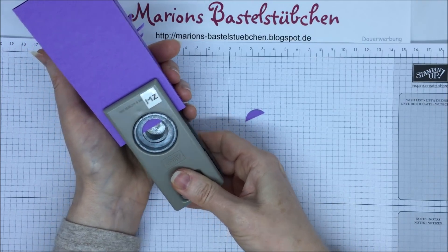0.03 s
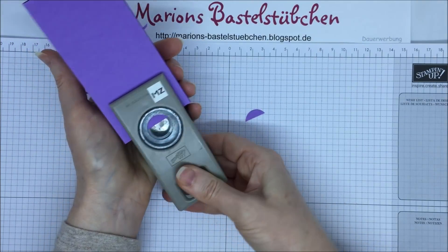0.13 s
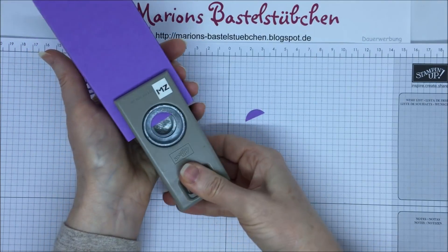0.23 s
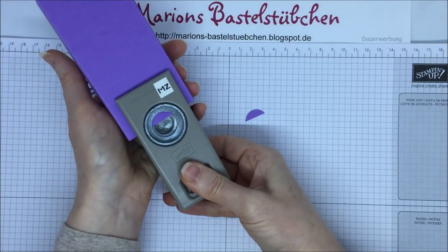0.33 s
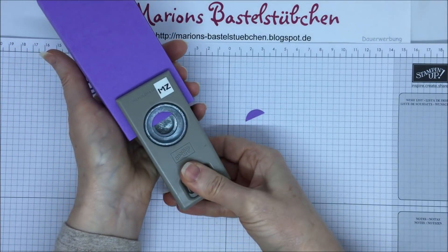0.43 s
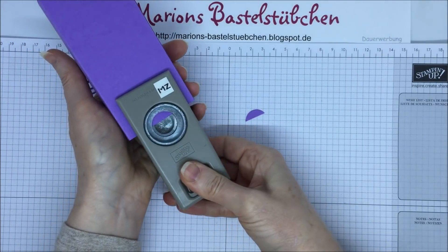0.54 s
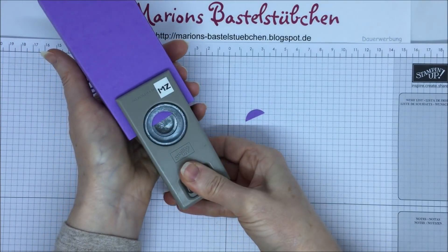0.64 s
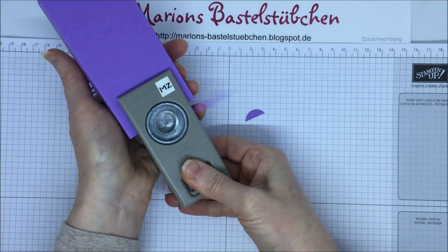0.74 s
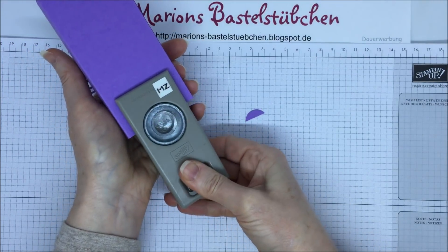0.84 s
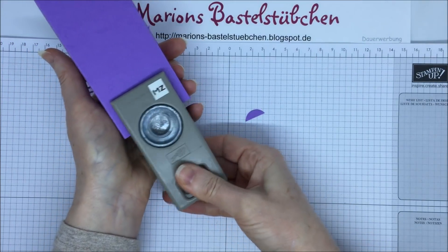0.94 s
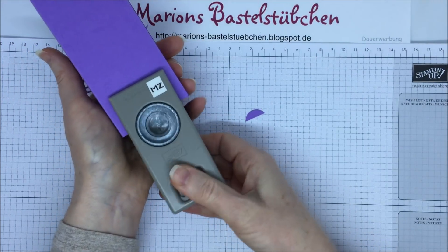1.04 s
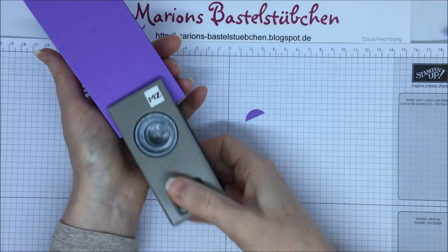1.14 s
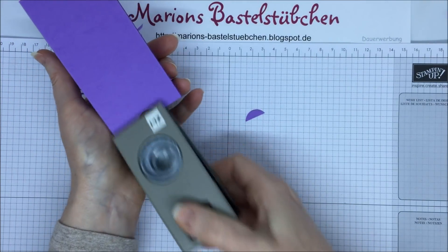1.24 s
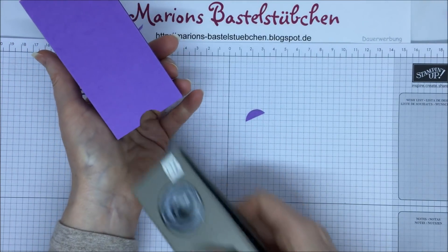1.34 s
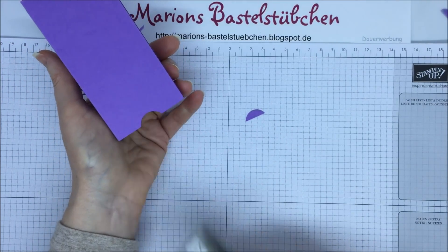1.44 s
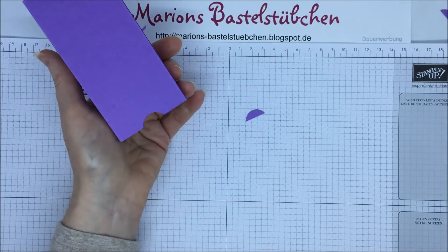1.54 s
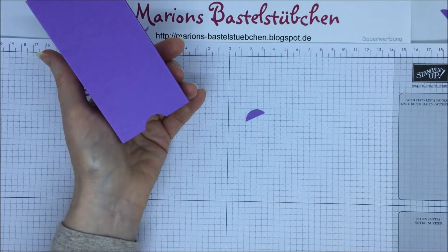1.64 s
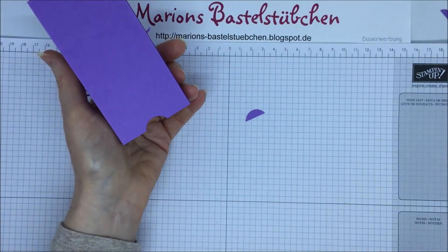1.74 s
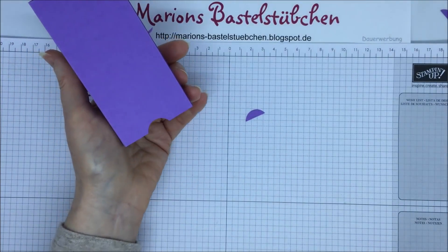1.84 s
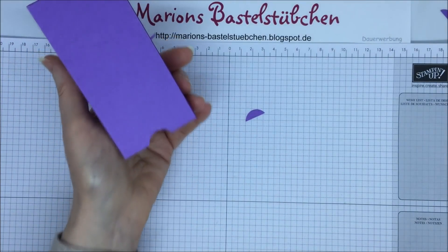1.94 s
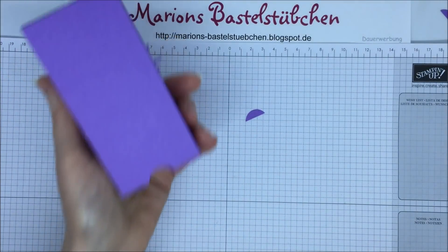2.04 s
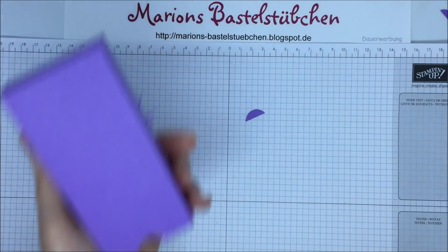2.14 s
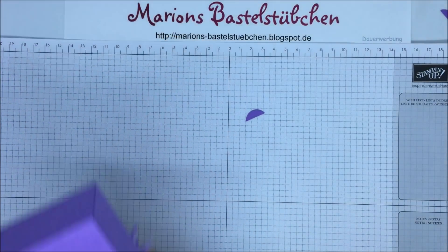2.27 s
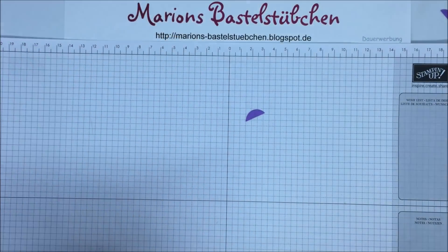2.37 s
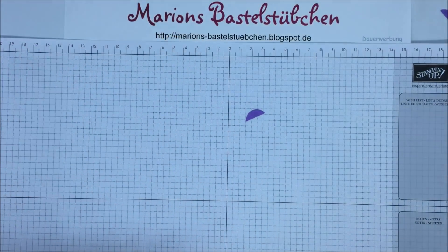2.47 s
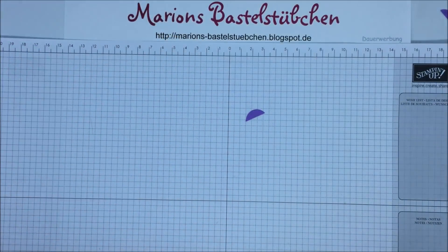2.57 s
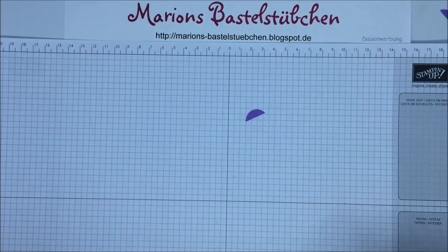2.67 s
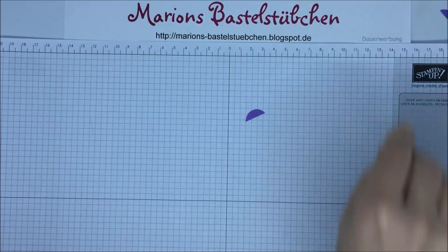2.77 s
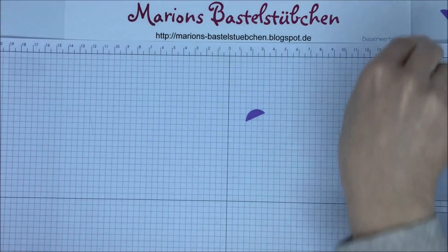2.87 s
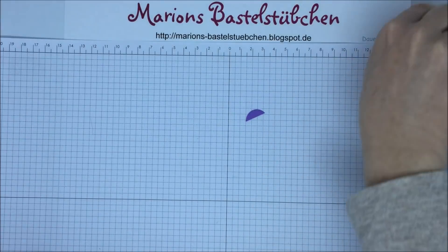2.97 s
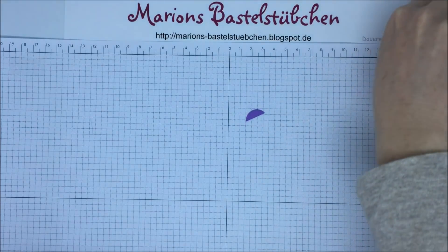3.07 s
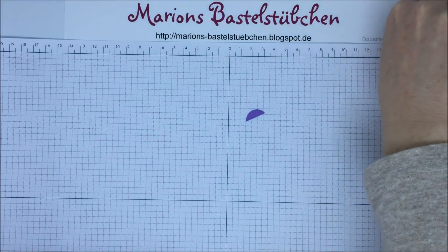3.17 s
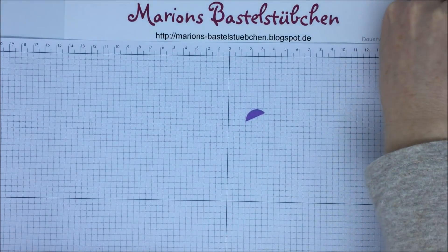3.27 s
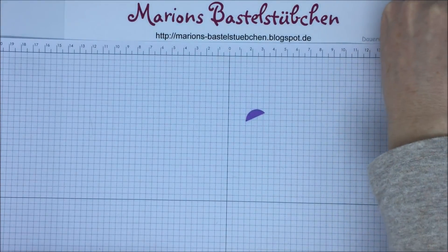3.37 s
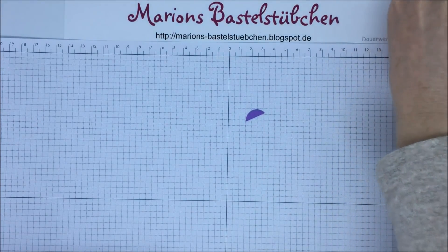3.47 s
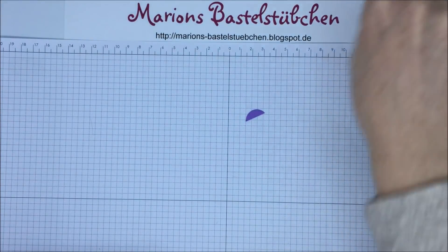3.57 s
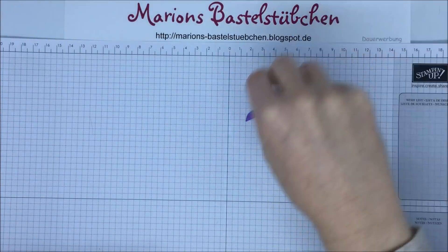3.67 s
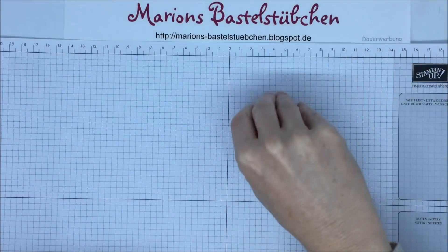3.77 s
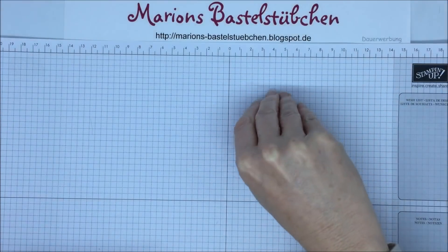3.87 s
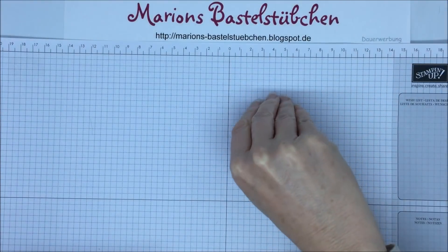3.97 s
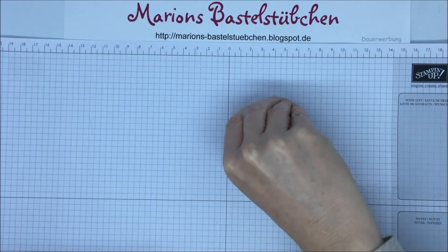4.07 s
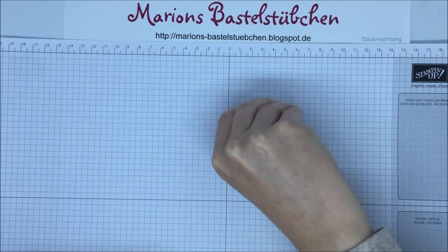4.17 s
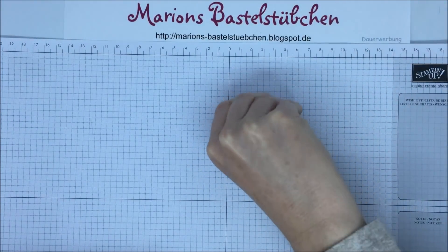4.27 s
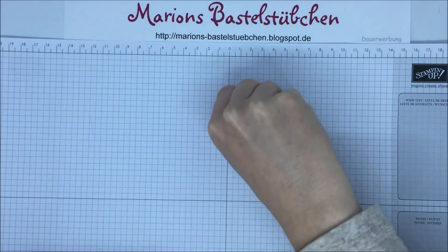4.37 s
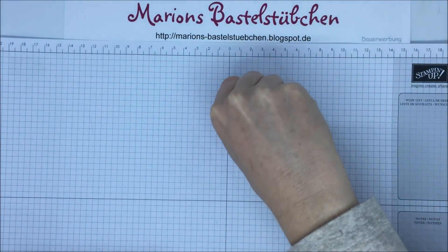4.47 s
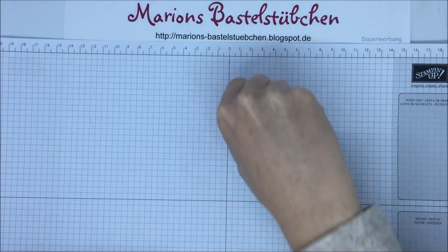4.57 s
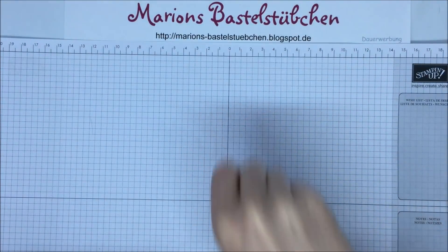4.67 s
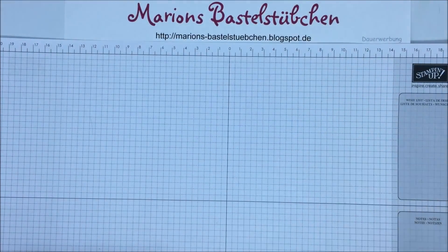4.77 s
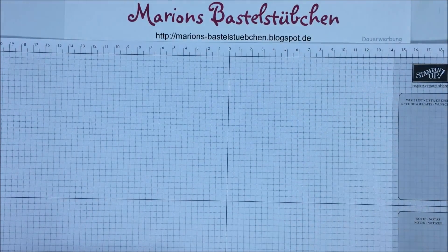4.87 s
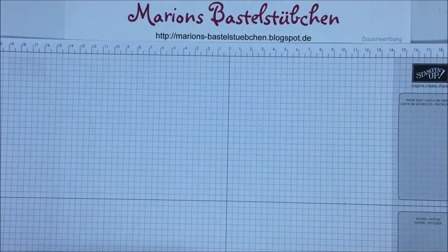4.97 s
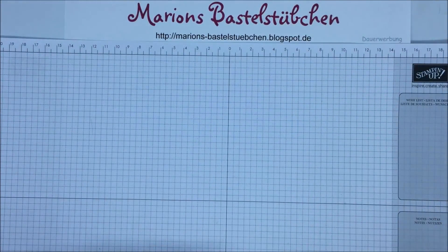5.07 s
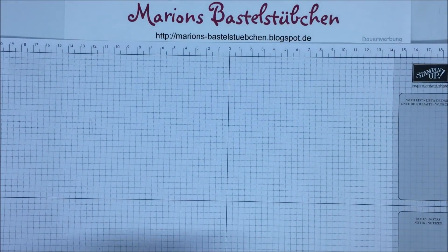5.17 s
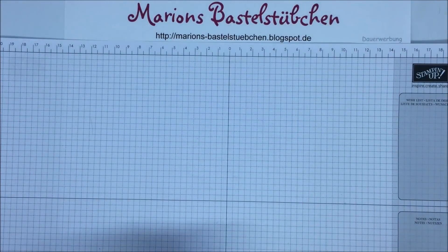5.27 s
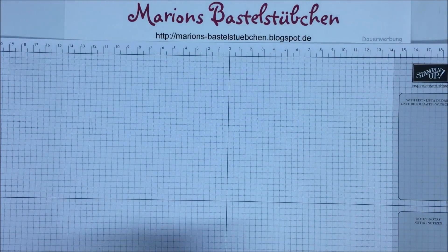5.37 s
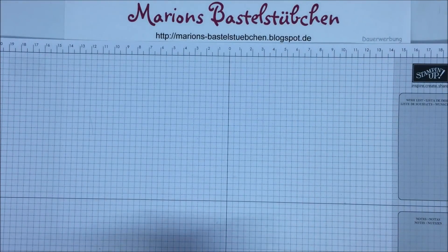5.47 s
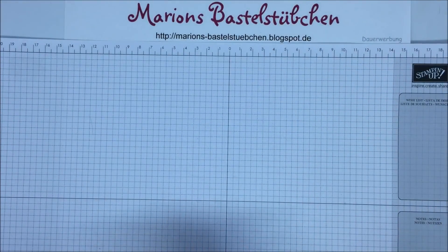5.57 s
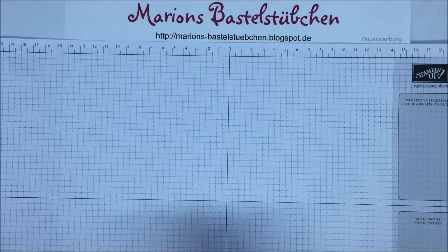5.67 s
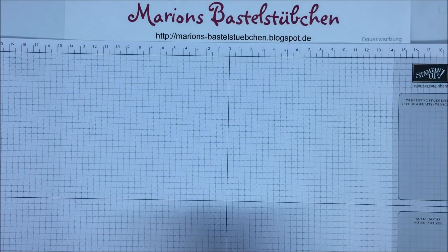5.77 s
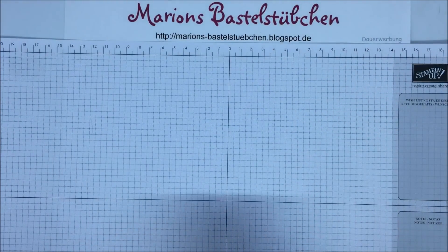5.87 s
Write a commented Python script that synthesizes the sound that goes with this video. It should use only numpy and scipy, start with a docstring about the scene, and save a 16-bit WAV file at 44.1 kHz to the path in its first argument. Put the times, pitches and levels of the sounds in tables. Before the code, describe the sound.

Close to the microphone, a hand-held paper punch bites through cardstock with a loud, sharp snap and springs back with a smaller click. The card rasps briefly out of the slot. Off to the side the punch knocks down on the table, and something light is put beside it. Fingertips then scrape faintly over a paper mat, with a few tiny ticks, in a small, quiet room with a low rumble.

```python
"""A craft table in a small, quiet room with a low rumble; one microphone, close to the hands.
A hand-held lever punch bites through cardstock and springs back, its snaps overloading the input.
The card rasps out of the steel slot. Off to the side the punch is set down, ringing the table top,
and something light is put beside it. Close in again, fingertips scrape the cut-out off the paper mat."""
import sys
import numpy as np
from scipy import signal
from scipy.fft import rfft, irfft, next_fast_len
from scipy.io import wavfile
from scipy.ndimage import map_coordinates

SR = 44100
rng = np.random.default_rng(int(sys.argv[2]) if len(sys.argv) > 2 else 0)


def wrap_up_sound(samples):
    """Save the sound to the file named by the first command line argument, as 16-bit audio."""
    columns = np.atleast_2d(samples).T
    # keep every value between -1 and 1, then stretch to whole-number steps
    tamed = np.clip(columns, -1, 1)
    steps = np.round(tamed * 32767).astype(np.int16)
    wavfile.write(sys.argv[1], SR, steps)


N = 260565
TIME = np.arange(N) / SR
AGE = np.arange(SR // 2) / SR  # seconds since a blow or stroke began
ONSET = SR // 100  # samples over which a blow's level counts


def amp(db):
    """Decibels to gain."""
    return 10 ** (np.asarray(db) / 20)


def unit(x, size=None):
    """x scaled to rms 1 over its first size samples."""
    return x / np.sqrt(np.mean(x[:size] ** 2) + 1e-20)


def along(points, hz):
    """(f/Hz, value) points read on a log frequency axis."""
    f, values = np.transpose(points)
    return np.interp(np.log(hz + 1), np.log(f), values)


def octaves(hz):
    """Octaves above one kilohertz, held constant below 100 Hz."""
    return np.log2(np.maximum(hz, 100) / 1000)


def dying(t, t60):
    """A fall of 60 dB in t60 seconds."""
    return np.exp(-np.log(1000) * t / np.maximum(t60, 0.003))


def add(track, s, sound):
    """Mix a sound into the track at s seconds."""
    part = track[max(round(s * SR), 0):][:len(sound)]
    part += sound[:len(part)]


def coloured(x, spectrum, tilt_db=0):
    """x given a spectrum and a tilt per octave, at rms 1."""
    size = next_fast_len(len(x) + 4096)
    hz = np.fft.rfftfreq(size, 1 / SR)
    gain = amp(along(spectrum, hz) + tilt_db * octaves(hz))
    return unit(irfft(rfft(x, size) * gain, size)[:len(x)])


def ring(modes, rise, tilt_db=0, scatter_db=1):
    """A struck body's modes, at slightly new strengths for every blow."""
    hz, db, t60 = np.transpose(modes)[:, :, None]
    level = db + tilt_db * octaves(hz) + scatter_db * rng.standard_normal(hz.shape)
    sign = (-1.0) ** np.arange(len(hz))[:, None]  # neighbouring modes push the air opposite ways
    waves = sign * amp(level) * dying(AGE, t60) * np.sin(2 * np.pi * hz * AGE)
    return unit(waves.sum(0) * (1 - np.exp(-AGE / rise)), ONSET)


def burst(spectrum, t60, rise, tilt_db=0):
    """Countless short-lived modes: coloured noise that dies away."""
    noise = coloured(rng.standard_normal(len(AGE)), spectrum, tilt_db)
    return unit(noise * dying(AGE, t60) * (1 - np.exp(-AGE / rise)), ONSET)


def slips(size, rate, grain_db, catch_db, catch_rate=110):
    """Paper friction: tiny fibre slips on a hiss, swelling wherever the surface catches."""
    hiss, strength, knots = rng.standard_normal((3, size))
    grains = unit(strength * (rng.random(size) < rate / SR))
    catching = map_coordinates(knots, [np.arange(size) * catch_rate / SR], mode="nearest")
    return (hiss + amp(grain_db) * grains) * amp(catch_db * catching)


# spectrum of the room's air: f/Hz, level/dB
AIR_SPECTRUM = [(15, -40.5), (25, -10), (48, -9), (74, -12.5), (91, -3), (137, 2.5), (165, -11.5),
                (194, -7.5), (261, -19.5), (928, -25), (1030, -24), (1220, -23.5), (4940, -30.5),
                (8940, -34.5), (15800, -40)]
def room_tone():
    """All around the microphone, the air carries a steady low rumble and a faint hiss."""
    return coloured(rng.standard_normal(N), AIR_SPECTRUM)


# strokes over card and mat, the first being the card fed into the punch's slot: t/s, length/s, level/dB,
# pressure/dB (drone over scrape)
STROKES = [(0.141, 0.29, -67.5, -22.5), (1.416, 0.058, -56.5, 14.5), (2.861, 0.28, -67, -4),
           (3.275, 0.091, -50.5, -13), (3.35, 0.12, -58.5, 10), (3.48, 0.12, -73, 3),
           (3.61, 0.03, -57, -19), (3.987, 0.058, -48.5, -15), (4.017, 0.098, -60, 9),
           (4.156, 0.18, -55, 6), (4.279, 0.51, -68, 7), (4.455, 0.077, -52.5, 2),
           (4.708, 0.06, -52.5, -11.5), (5.62, .16, -66.5, -4)]
# spectra of the mat's scrape and of its drone: f/Hz, level/dB
MAT_SCRAPE = [(100, -18), (300, -32), (540, 10), (740, -18), (900, 5), (1090, -17), (1280, 10),
              (1550, -5.5), (2100, -1), (3100, -6.5), (5000, -8), (10000, -14.5), (16000, -16)]
MAT_DRONE = [(40, -51), (130, -5.5), (230, 2), (350, -17.5), (550, -16), (800, -37), (3000, -49)]
def fingers():
    """Close up, the card is first fed into the slot; then fingers rub the paper: a pressed one drones and
    sounds duller, a light one hisses."""
    out = np.zeros(N)
    for s, length, db, pressure_db in STROKES:
        stroke = np.sin(np.pi * np.minimum(AGE / length, 1))
        friction = slips(len(AGE), rate=2200, grain_db=1.5, catch_db=2.5)
        scrape = coloured(friction, MAT_SCRAPE, tilt_db=2.03 - 0.078 * pressure_db)
        drone = coloured(rng.standard_normal(len(AGE)), MAT_DRONE)
        add(out, s, amp(db) * stroke * (scrape + amp(pressure_db) * drone))
    return out


# flicks of card edges and fingernails: t/s, level/dB, tilt/(dB per octave), t60/s
EDGE_FLICKS = [(0.515, -67.5, -8.5, 0.034), (0.8492, -43.5, -7, .06), (0.8906, -17, 3.5, 0.063),
               (1.300, -37, -8, 0.036), (1.3234, -27.5, -0.5, 0.022), (1.432, -36.5, -3.5, 0.012),
               (1.619, -58.5, -6, .06), (3.279, -51, -6.5, 0.094), (4.494, -47.5, -7, 0.058)]
# spectrum of a flicked edge: f/Hz, level/dB
EDGE_SPECTRUM = [(40, -47.5), (200, -23), (900, -18), (2000, 0), (4000, 4.5), (5500, -2.5), (8000, -14.5),
                 (16000, -19)]
def flicks():
    """Close up, stiff paper catches and lets go with dry ticks."""
    out = np.zeros(N)
    for s, db, tilt_db, t60 in EDGE_FLICKS:
        add(out, s, amp(db) * burst(EDGE_SPECTRUM, t60, rise=0.0001, tilt_db=tilt_db))
    return out


# the card loosens in the slot, starts to move and is pulled clear: t/s, length/s, level/dB
CARD_SLIDES = [(1.142, 0.098, -51), (1.273, 0.052, -44), (1.335, 0.091, -36.5)]
# spectrum of sliding card: f/Hz, level/dB
CARD_RASP = [(60, -27.5), (220, -7), (500, -2.5), (740, -10.5), (1000, 0), (2200, -2), (2950, -2),
             (3200, -10), (3800, -1.5), (5200, -13.5), (6200, -10.5), (9000, -14), (10600, -22.5),
             (13500, -17), (16000, -20)]
def card(swell_db=-38.5, swell_db_per_s=800.5, attack_s=0.017):
    """Close up, a brief rasping hiss swells into the first snap; later the card rasps along the slot."""
    to_snap = PUNCH_CONTACTS[0][0] - TIME
    level = amp(swell_db - swell_db_per_s * np.abs(to_snap)) * (to_snap > 0)
    for s, length, db in CARD_SLIDES:
        attack = np.minimum(AGE / attack_s, 1)
        release = dying(np.maximum(AGE - length, 0), t60=0.08)
        add(level, s, amp(db) * attack * release)
    return level * coloured(slips(N, rate=2100, grain_db=-0.5, catch_db=1.5), CARD_RASP)


# the die cuts, bottoms out, springs back: t/s, level/dB, tilt/(dB per octave), crack/dB over level
PUNCH_CONTACTS = [(0.8692, -11, -1, 1.5), (.8745, -9.5, -5.5, -7), (.8942, -9.5, 6, 3),
                  (1.091, -46.5, -17, -18), (1.121, -39.5, -1, -3), (1.1392, -22, 3, -24),
                  (1.184, -45.5, -7, -26.5), (1.229, -48, -5.5, -6)]
# modes of the punch's casing and spring: f/Hz, level/dB, t60/s
CASING_MODES = [(514, -11.5, 0.1), (960, -8.5, .04), (1224, -6, .045), (1295, -3, .045), (1502, -4, .05),
                (1660, -2.5, .03), (1880, -4.5, .04), (2018, -0.5, 0.026), (2320, -3, .04),
                (2900, -16, .03), (4170, -20, .05), (4780, -21, .035), (8800, -26, .018)]
# spectra of loose parts, a sharp crack and a dull thud: f/Hz, level/dB
CLATTER_SPECTRUM = [(40, -39.5), (200, -13), (480, -9), (720, -16), (950, -2.5), (2100, 0), (2900, -8.5),
                    (4500, -17), (7000, -23), (16000, -39)]
CRACK_SPECTRUM = [(100, -21.5), (700, -8.5), (2300, -2), (4600, -1.5), (6800, -4.5), (9000, -0.5),
                  (10300, -7), (16000, -7)]
THUD_SPECTRUM = [(40, -18), (150, -2.5), (220, 4.5), (320, -0.5), (410, -10.5), (520, 1), (720, -19),
                 (1000, -6.5), (2000, -51.5), (6000, -38.5)]
def punch(rattle_db=-1, jolt_db=-22):
    """Right at the microphone, each contact rings the casing, rattles the loose lever and cracks."""
    casing, noises = np.zeros((2, N))
    for s, db, tilt_db, crack_db in PUNCH_CONTACTS:  # steel on steel is the brightest
        add(casing, s, amp(db) * ring(CASING_MODES, rise=0.0014, tilt_db=tilt_db))
        rattle = burst(CLATTER_SPECTRUM, t60=0.038, rise=0.0012, tilt_db=0.4 * tilt_db)
        add(noises, s, amp(db + rattle_db) * rattle)
        add(noises, s, amp(db + crack_db) * burst(CRACK_SPECTRUM, t60=0.036, rise=0.0003))
    # the punch jolts in the hand as the card gives way
    jolt = burst(THUD_SPECTRUM, t60=0.06, rise=0.0013, tilt_db=-3)
    add(noises, PUNCH_CONTACTS[0][0], amp(jolt_db) * jolt)
    return casing + desk(noises)


# modes of the table's top board and of its frame: f/Hz, level/dB, t60/s
BOARD_MODES = [(205, -5, 0.19), (248.5, 6.5, 0.17), (318.3, 0, 0.23), (343, -9, 0.12), (488, -3.5, .16),
               (604, -12.5, 0.11), (615, -8.5, .17), (730, -9.5, 0.16), (845, -20, 0.35),
               (1029, -6.5, 0.16), (1369, -8.5, .09)]
FRAME_MODES = [(52, -18, 0.2), (87.4, -9, 0.14), (124, -13, 0.14)]
def knock(board_db, frame_db, thud_db, clatter_db, crack_db, rise=0.0005, frame_lag_s=0.011):
    """One blow on the table: the board rings and thuds, the object rattles, the frame follows."""
    out = amp(board_db) * ring(BOARD_MODES, rise=0.00029)
    out += amp(thud_db) * burst(THUD_SPECTRUM, t60=0.079, rise=0.0021)
    out += amp(clatter_db) * burst(CLATTER_SPECTRUM, t60=0.1, rise=rise)
    out += amp(crack_db) * burst(CRACK_SPECTRUM, t60=0.038, rise=rise, tilt_db=-3)
    add(out, frame_lag_s, amp(frame_db) * ring(FRAME_MODES, rise=0.0024))
    return out


# the punch lands on its steel edge, rocks, then drops flat: t/s, board/dB, thud/dB, plate/dB
PUNCH_LANDINGS = [(2.4003, -35.5, -48, -24), (2.417, -49, -51, -34.5), (2.5282, -24.5, -24.5, -48),
                  (2.5333, -19.5, -23.5, -28.5)]
# modes of the punch's base plate: f/Hz, level/dB, t60/s
PLATE_MODES = [(1041, -12, .11), (1486, -0.5, 0.025), (1738, -9.5, .08), (1868, -16, 0.19),
               (2053, 5, 0.027), (2314, -0.5, .033), (2395, 0, 0.033)]
def punch_set_down(steel_db=-11):
    """Off to the side, the heavy punch rings the table and its own base plate."""
    out = np.zeros(N)
    for s, board_db, thud_db, plate_db in PUNCH_LANDINGS:
        add(out, s, knock(board_db, frame_db=board_db - 11, thud_db=thud_db,
                          clatter_db=thud_db - 6.5, crack_db=thud_db - 19))
        plate = ring(PLATE_MODES, rise=0.0011)
        steel_edge = burst(EDGE_SPECTRUM, t60=0.042, rise=0.0004, tilt_db=-6)
        add(out, s, amp(plate_db) * (plate + amp(steel_db) * steel_edge))
    return out


# touches on a small plastic piece: t/s, level/dB
PLASTIC_TOUCHES = [(3.219, -66), (3.983, -54), (4.003, -56), (5.385, -51)]
# its modes: f/Hz, level/dB, t60/s
PLASTIC_MODES = [(1540, 0, 0.12), (1740, -6, 0.054), (1940, 13.5, 0.032), (2130, 8, 0.071), (3090, 5, 0.07),
                 (4310, 2, 0.096), (4800, 1.5, 0.082), (5870, 5, 0.089), (7300, -11, .035),
                 (11420, 5, 0.08), (11800, -4, 0.06)]
def plastic_ticks(crack_db=-4):
    """Off to the side, a light plastic piece clicks and rings briefly."""
    out = np.zeros(N)
    for s, db in PLASTIC_TOUCHES:
        body = ring(PLASTIC_MODES, rise=0.0022)
        crack = burst(CRACK_SPECTRUM, t60=0.13, rise=0.00033, tilt_db=0.5)
        add(out, s, amp(db) * (body + amp(crack_db) * crack))
    return out


# a light object is put down and settles: t/s, level/dB
OBJECT_TAPS = [(3.3236, -31), (3.384, -47.5), (3.45, -50.5)]
def light_object():
    """Beside the punch, something light thuds and clicks, barely ringing the board."""
    out = np.zeros(N)
    for s, db in OBJECT_TAPS:
        tap = knock(board_db=-14.5, frame_db=-7.5, thud_db=0.5, clatter_db=-10, crack_db=-6.5, rise=0.001)
        add(out, s, amp(db) * tap)
    return out


# resonances of the work place under the hands: f/Hz, width/Hz, level/dB
DESK_RESONANCES = [(597.9, 70, 5.5), (970, 150, 5.5), (1240, 28, 1.5), (1740, 70, 3), (2090, 97, -1.5),
                   (2660, 70, -4), (3830, 43, -2), (4420, 44, -4)]
def desk(x, echo_s=0.0024, echo_db=-11):
    """The table's resonances and one quick bounce off its top colour a close sound."""
    size = next_fast_len(N + SR // 2)
    f = np.fft.rfftfreq(size, 1 / SR)
    body = 1 + sum(amp(db) * 1j * f * width / (hz * hz - f * f + 1j * f * width)
                   for hz, width, db in DESK_RESONANCES)
    bounce = 1 + amp(echo_db) * np.exp(-2j * np.pi * f * echo_s)
    return amp(-2.5) * irfft(rfft(x, size) * body * bounce, size)[:N]


# the small room's reverberation: f/Hz, t60/s
ROOM_DECAY = [(100, .35), (300, .45), (1500, .58), (5000, 0.48), (9000, 0.29), (15000, 0.22)]
def room(x, build_s=0.016):
    """The walls' diffuse answer builds up, then dies soonest in the treble."""
    hz, t, noise = signal.stft(rng.standard_normal(SR), SR, nperseg=256)
    fade = dying(t, along(ROOM_DECAY, hz)[:, None]) * (1 - np.exp(-t / build_s))
    tail = signal.istft(noise * fade, SR, nperseg=256)[1]
    return signal.fftconvolve(x, tail / np.linalg.norm(tail))[:N]


def scene():
    """At the microphone the handwork is near and dry; sounds from the side carry more of the room."""
    near = punch() + desk(flicks() + card() + fingers())
    aside = punch_set_down() + light_object() + plastic_ticks()
    air = amp(-63) * room_tone()
    walls = room(amp(-30.5) * near + amp(-23.5) * aside)
    return (near + aside + walls + air)[None]


def record(dry, hardness=8, low_cut_hz=44, top_hz=15950):
    """One channel, low cut in: the input overloads on the loudest snaps; the top treble is dropped."""
    thinned = signal.sosfilt(signal.butter(2, low_cut_hz, "highpass", fs=SR, output="sos"), dry)
    clipped = thinned / (1 + np.abs(thinned) ** hardness) ** (1 / hardness)
    low_pass = signal.firwin(181, top_hz, fs=SR)
    return signal.fftconvolve(clipped, low_pass[None], mode="same")


dry = scene()
out = record(dry)
wrap_up_sound(out)
```